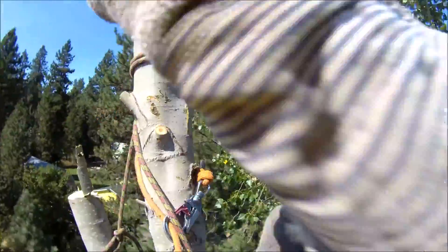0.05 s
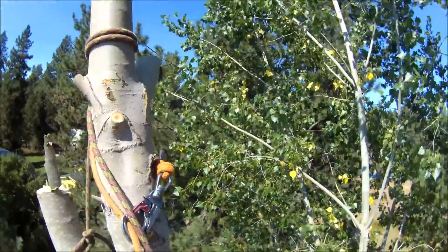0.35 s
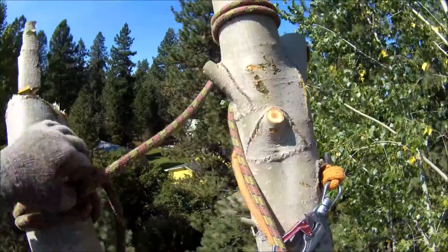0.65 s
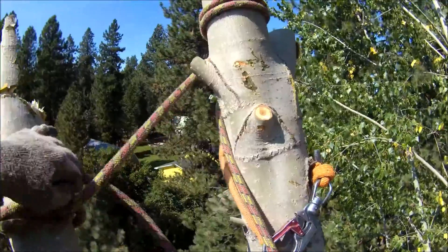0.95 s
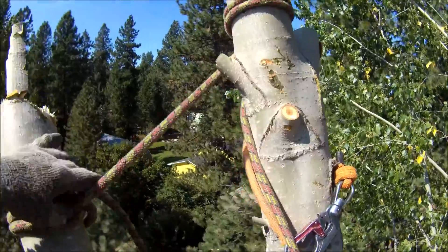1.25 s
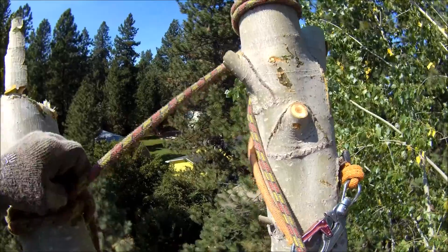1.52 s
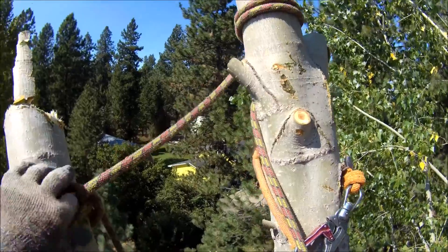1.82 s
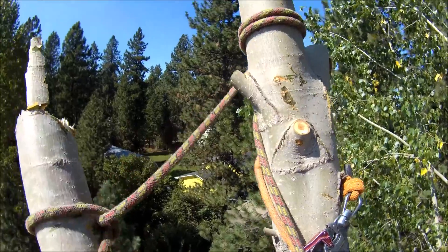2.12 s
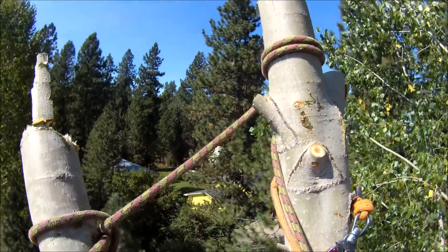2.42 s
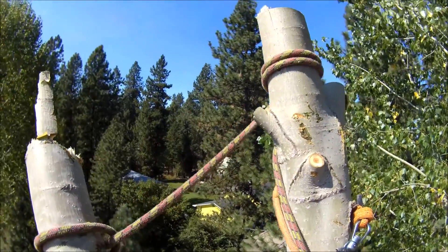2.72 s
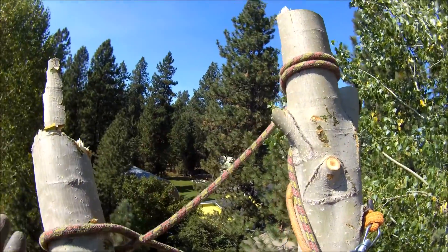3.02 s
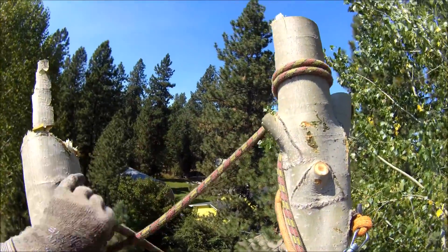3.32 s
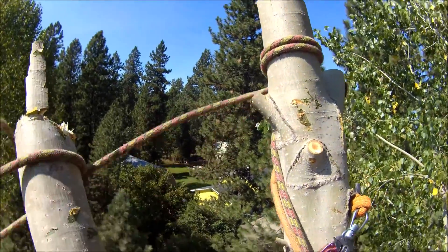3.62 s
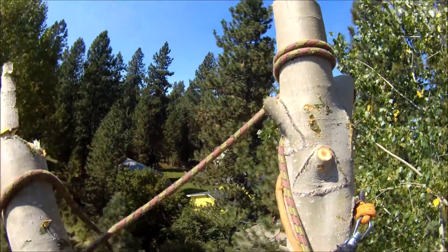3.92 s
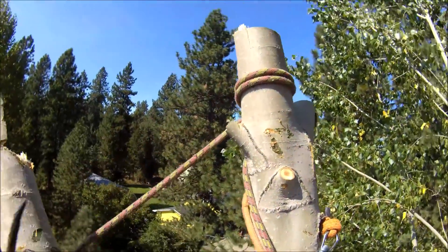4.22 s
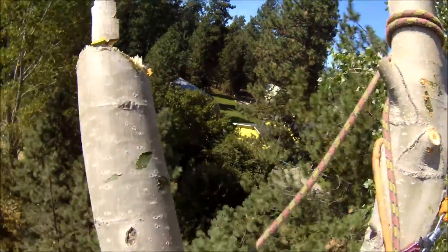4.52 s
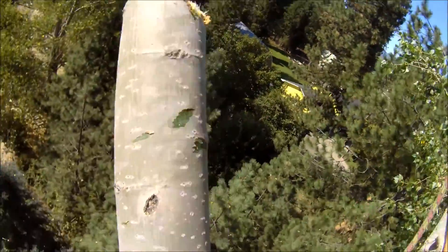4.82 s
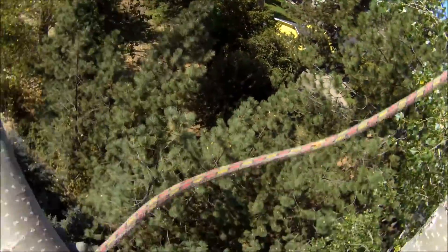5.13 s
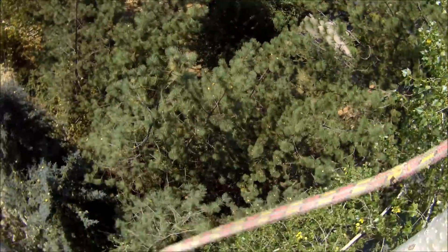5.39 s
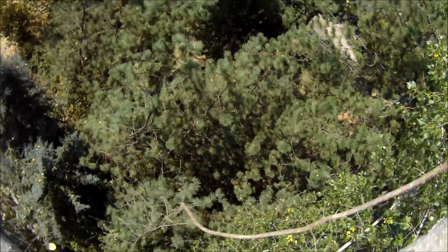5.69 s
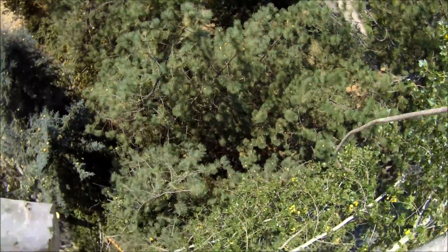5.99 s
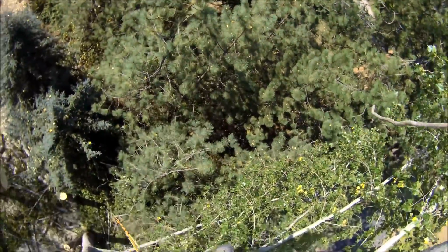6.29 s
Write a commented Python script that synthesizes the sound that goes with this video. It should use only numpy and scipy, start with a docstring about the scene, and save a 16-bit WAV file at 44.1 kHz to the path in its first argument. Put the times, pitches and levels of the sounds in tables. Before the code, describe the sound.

Steady wind rushes and rumbles high in a tree, sounding boxy through a helmet camera. At the start, gear scuffs and clacks loudly right by the microphone, and rope slips faintly over bark. Then a partly cut trunk section snaps close by with one loud, slightly distorted crack and a brief woody ring. The wind carries on with low gusts and a few hollow knocks on the helmet near the end.

```python
"""High in a tree, steady wind comes through the boxy housing of a climber's helmet camera and buffets it.
Gear scuffs and knocks on the helmet, a saw is hooked on and bumps the trunk as a sleeve brushes the
microphone with a muffled thud, and rope slips over bark.
At 2.65 s a partly cut trunk section snaps close by: its fibres tear, overloading the microphone's
input stage, and the freed trunk rings on. More slips of rope, gusts and knocks follow."""
import sys
import numpy as np
from scipy import signal
from scipy.fft import rfft, irfft
from scipy.io import wavfile
from scipy.ndimage import uniform_filter1d

SR = 44100
rng = np.random.default_rng(int(sys.argv[2]) if len(sys.argv) > 2 else 0)


def log_audio(samples):
    """Write samples as a 16-bit WAV file to the path given in sys.argv[1]."""
    # one column per channel
    frames = np.atleast_2d(samples).T
    # limit to full scale, then quantise
    limited = np.clip(frames, -1, 1)
    pcm = np.round(limited * 32767).astype(np.int16)
    wavfile.write(sys.argv[1], SR, pcm)


N = 280035
T = np.arange(N) / SR
RING_T = T[:int(.7 * SR)]  # time axis of one short event


def undb(db):
    """Decibels to amplitude ratio."""
    return 10 ** (np.asarray(db) / 20)


def unit(x):
    """Normalisation to rms 1."""
    return x / np.sqrt(np.mean(x ** 2))


def add(out, start_s, x):
    """Superposition: x joins out at its start time."""
    i = max(int(start_s * SR), 0)
    out[i:i + len(x)] += x[:N - i]


def colour(x, outline, peaks=()):
    """Spectral shaping by a (Hz, dB) outline with resonant peaks on top."""
    f = np.fft.rfftfreq(len(x), 1 / SR) + 1
    hz, db = np.transpose(outline)
    gain = undb(np.interp(np.log(f), np.log(hz), db))
    for centre, width, peak_db in peaks:
        gain *= 1 + (undb(peak_db) - 1) / np.hypot(1, 2 * (f - centre) / width) ** 2
    return irfft(rfft(x) * gain, len(x))


def noise(count, outline, peaks=()):
    """Coloured Gaussian noise of rms 1."""
    return unit(colour(rng.standard_normal(count), outline, peaks))


def soften(x, corner_hz):
    """Second-order low-pass: a softer contact carries less treble."""
    return signal.sosfilt(signal.butter(2, min(corner_hz, SR / 3), fs=SR, output="sos"), x)


def grains(count, spread_db):
    """Impulsive noise: dense clicks of uneven size."""
    clicks = rng.standard_normal(count)
    return unit(clicks * undb(spread_db * np.minimum(rng.exponential(size=count), 3)))


def wander(rate_hz):
    """Smooth random modulation of rms 1."""
    hold = int(SR / rate_hz)
    steps = np.repeat(rng.standard_normal(N // hold + 1), hold)
    return unit(uniform_filter1d(uniform_filter1d(steps, hold), hold)[:N])


def swell(length, t=RING_T):
    """Half-sine envelope: a movement speeds up and slows to rest."""
    return np.sin(np.pi * np.clip(t / length, 0, 1))


def fade(t60):
    """Exponential damping: a free vibration loses 60 dB in t60 seconds."""
    return np.exp(-np.log(1000) * RING_T / t60)


def ring(modes):
    """Modal superposition: damped sinusoids, neighbours in opposite phase."""
    return sum((-1) ** k * undb(db) * fade(t60) * np.sin(2 * np.pi * hz * RING_T)
               for k, (hz, db, t60) in enumerate(modes))


# Wind in the trees. Each row: frequency in Hz, relative spectral density in dB.
TREE_SPECTRUM = [(100, -0.5), (300, -0.5), (490, 2.5), (660, -4), (900, 2.5), (1380, 1), (1700, -3),
                 (2000, -9.5), (2900, -12.5), (3500, -18.5), (4900, -21), (5500, -16), (7000, -33)]
# Resonances of the housing. Each row: centre in Hz, width in Hz, gain in dB.
HOUSING_PEAKS = [(1105, 29, 6.5), (1310, 150, 4.5), (2825, 41, 4.5), (4380, 68, 15)]
def tree_wind(level_db=-48):
    """Cavity resonance: the housing colours the far rush of the trees."""
    return noise(N, TREE_SPECTRUM, HOUSING_PEAKS) * undb(level_db + 0.16 * wander(6.5))


# Gusts as the head turns. Each row: start in seconds, length in seconds, level in dB.
GUSTS = [(0, 1.07, -38.5), (2.05, 0.31, -41), (3.6, .25, -44), (4.7, 2.1, -42.5)]
def buffeting(steady_db=-44.5, flutter_db=-51.5):
    """Turbulent pressure: eddies push on the housing, and stronger ones flutter more."""
    push = undb(steady_db) + sum(undb(db) * swell(length, T - start) for start, length, db in GUSTS)
    push_db = 20 * np.log10(push)
    flutter_gain = undb(flutter_db + 0.25 * (push_db - push_db.mean()) + wander(11))
    rumble = noise(N, [(5, -15), (18, 13), (35, -1), (50, 3.5), (65, -11), (130, -46.5), (500, -86)])
    flutter = noise(N, [(40, -4), (90, 3), (150, -1.5), (210, -1), (280, -12.5), (1000, -35.5)])
    return rumble * push + flutter * flutter_gain


# Microphone hiss. Each row: frequency in Hz, relative spectral density in dB.
HISS_SPECTRUM = [(1000, 1.5), (7000, 1.5), (10000, -1.5), (15000, 0.5)]
def hiss(level_db=-64):
    """Self-noise: the microphone adds a steady broadband floor."""
    return undb(level_db) * noise(N, HISS_SPECTRUM)


# Gritty contact heard through the housing. Each row: frequency in Hz, relative spectral density in dB.
CONTACT_SPECTRUM = [(30, 5), (75, 6), (170, 9.5), (300, -2), (480, 7.5), (580, -10), (1100, 5),
                    (1550, -1.5), (2000, -11.5), (3100, -7.5), (3600, -17), (5000, -15), (6000, -10),
                    (8500, -29)]
def friction(length, corner_hz, skew=.7, trail=1.6):
    """Sliding friction: a dense run of tiny slips bites early and trails away."""
    pressure = swell(0.95, (RING_T / length) ** skew) ** trail
    slips = colour(grains(len(RING_T), spread_db=5.5), CONTACT_SPECTRUM)
    return unit(soften(slips, corner_hz)) * pressure


# Drags of gear. Each row: start in seconds, length in seconds, level in dB.
SCUFFS = [(.005, 0.078, -30.5), (0.065, 0.15, -26), (.36, 0.3, -48.5)]
def gear_scuffs():
    """Friction noise: gear drags over sleeve and helmet."""
    out = np.zeros(N)
    for start, length, db in SCUFFS:
        add(out, start, undb(db) * friction(length, corner_hz=3400))
    return out


# Modes of helmet and camera mount. Each row: frequency in Hz, level in dB, T60 in seconds.
HELMET_MODES = [(76, -24.5, 0.068), (107.5, -28, 0.098), (189.5, -19, 0.095), (295, -29.5, 0.055),
                (364, -22.5, 0.062), (440, -22.5, 0.057), (490, -24.5, 0.071), (920, -21, 0.023),
                (1057, -20.5, 0.058), (1150, -27.5, 0.014), (1644, -22, 0.03), (1920, -25.5, 0.031),
                (2210, -23.5, 0.037), (2440, -16, 0.0086), (2956, -18, 0.014), (4050, -28, 0.006),
                (4950, -41, 0.0052), (6660, -28, 0.015)]
def struck_helmet(spot_hz, neutral_hz=730, bass_db_per_octave=6.5):
    """Modal excitation: a spot favours modes near its pitch; a lower, softer one takes more bass."""
    bass_db = bass_db_per_octave * np.log2(neutral_hz / spot_hz)
    modes = []
    for hz, db, t60 in HELMET_MODES:
        shelf_db = bass_db / (1 + (hz / 600) ** 4)
        spot_db = 4 * np.exp(-10 * np.log2(hz / spot_hz) ** 2)
        modes.append((hz, db + shelf_db + spot_db, t60))
    return ring(modes)


# Blows on the helmet. Each row: start in seconds, gain in dB, contact corner in Hz, spot pitch in Hz.
KNOCKS = [(.018, -13.5, 1800, 200), (.028, -10.5, 5000, 352), (.061, 11, 7500, 1460),
          (0.0794, -9, 1310, 111), (0.0966, -4, 2600, 910), (0.4451, -10, 1740, 350), (.475, -17, 800, 330),
          (4.4199, -6, 2960, 347), (4.624, -15.5, 2290, 600), (4.798, -19, 1690, 1000),
          (4.828, -13.5, 1060, 1030), (5.735, -22.5, 1000, 455), (5.916, -27.5, 700, 190),
          (6.055, -0.5, 5640, 1170), (6.097, -7, 1680, 1100), (6.1706, -8, 2700, 470)]
def helmet_knocks(grit_db=-20, grit_t60_s=.048):
    """Impact: gear and rope ring the helmet through a gritty contact whose softness limits the treble."""
    out = np.zeros(N)
    for start, db, corner_hz, spot_hz in KNOCKS:
        grit = unit(colour(grains(len(RING_T), spread_db=-3), CONTACT_SPECTRUM))
        knock = struck_helmet(spot_hz) + undb(grit_db) * grit * fade(grit_t60_s)
        add(out, start, undb(db) * soften(knock, corner_hz))
    return out


# Modes of the hook. Each row: frequency in Hz, level in dB, T60 in seconds.
HOOK_MODES = [(996, 0.5, 0.031), (1310, 3, 0.015), (1800, 2, 0.0096), (3634, -8, 0.017), (5740, 3, 0.009),
              (8950, -22, 0.004)]
def saw_hook(start_s=.0622, gain_db=2.9):
    """Impulse response: the saw's steel hook snaps home and its heavily damped modes click."""
    out = np.zeros(N)
    add(out, start_s, undb(gain_db) * ring(HOOK_MODES))
    return out


# Modes of the trunk, bumped or snapped. Each row: frequency in Hz, level in dB, T60 in seconds.
TRUNK_MODES = [(85, -10, 0.12), (194.1, 3.5, 0.16), (245.4, 0.5, 0.064), (296, -8, 0.11), (379.9, -2, 0.29),
               (401.4, -0.5, 0.36), (482.2, -4, 0.23), (505, -14, 0.36), (535.4, -17.5, 0.32),
               (584, -32, 0.33), (995.6, -4, 0.23), (1079, -5.5, 0.23), (1181, -8.5, 0.2),
               (1233, -15, 0.19), (1355, -26, 0.29), (1434, -27, 0.37), (1719, -8, 0.15),
               (3000, -11, 0.038)]
def saw_bump_and_sleeve(start_s=.079, trunk_db=-26, sleeve_thud_db=-22):
    """Impact and friction: the saw rings the trunk; a sleeve brushes the microphone with a low thud."""
    out = np.zeros(N)
    sleeve_thud = friction(length=0.056, corner_hz=110)
    add(out, start_s, undb(trunk_db) * ring(TRUNK_MODES) + undb(sleeve_thud_db) * sleeve_thud)
    return out


# Rope on bark. Each row: frequency in Hz, relative spectral density in dB.
ROPE_SPECTRUM = [(3500, -7), (5000, -13), (5500, -2.5), (6300, -5.5), (7200, -29), (12000, -25.5)]
# Pulls of the rope. Each row: start in seconds, length in seconds, level in dB.
ROPE_PULLS = [(0.25, 0.33, -60), (1.99, 0.31, -65), (3.498, 0.12, -59), (4.97, 0.18, -67),
              (5.436, 0.41, -61.5)]
def rope_swishes(slack_db=-69.5, slack_spread_db=6):
    """Stick-slip friction: rope crosses bark in quick, uneven slips; slack rope shifts at random."""
    motion = undb(slack_db) * unit(undb(slack_spread_db * wander(7)))
    for start, length, db in ROPE_PULLS:
        add(motion, start, undb(db) * swell(length))
    rubbing = unit(colour(grains(N, spread_db=8), ROPE_SPECTRUM))
    slips = unit(undb(3.2 * wander(200)))
    return motion * rubbing * slips


# Catches of the rope. Each row: start in seconds, level in dB.
ROPE_TICKS = [(.379, -47), (.525, -46), (3.336, -44.5), (3.7197, -42)]
def rope_ticks():
    """Sudden release: a rope fibre catches on bark and lets go in a brief burst of treble."""
    out = np.zeros(N)
    spectrum = [(2500, -12), (4500, -4), (5500, 8.5), (8000, -12), (10000, -15), (15000, -34)]
    for start, db in ROPE_TICKS:
        add(out, start, undb(db) * noise(len(RING_T), spectrum) * fade(0.024))
    return out


# The trunk's dense modes, in bands. Each row: centre in Hz, level in dB, T60 in seconds.
TIMBER_BANDS = [(134, -4, 0.11), (417, 0, 0.17), (704, -27, 0.085), (1080, -9, 0.25), (1750, -21, 0.2),
                (2920, -22, 0.16), (5000, -22, 0.094)]
def trunk_ring(first_fibres_s=2.6502, freed_s=2.657):
    """Free vibration: dense modes blur into noise as fibres give; the freed trunk rings and beats."""
    out = np.zeros(N)
    for hz, db, t60 in TIMBER_BANDS:
        band = [(hz / 2, -50), (hz * .8, 0), (hz * 1.2, 0), (hz * 2, -50), (hz * 10, -90)]
        add(out, first_fibres_s, undb(db) * noise(len(RING_T), band) * fade(t60))
    add(out, freed_s, ring(TRUNK_MODES))
    return out


# Tearing wood fibres. Each row: frequency in Hz, relative spectral density in dB.
FIBRE_SPECTRUM = [(200, 1), (490, 7), (640, -8), (820, -7.5), (1050, 4.5), (2400, -5.5), (3050, 5.5),
                  (3700, -18), (12000, -5)]
def splinter(db, corner_at_0_db_hz=1780, db_per_octave=16.5, time_constant_s=0.0034):
    """Brittle fracture: a fibre bundle breaks in a burst of clicks, brighter under greater force."""
    clicks = colour(grains(len(RING_T), spread_db=7.5), FIBRE_SPECTRUM)
    corner_hz = corner_at_0_db_hz * 2 ** (db / db_per_octave)
    return undb(db) * unit(soften(clicks, corner_hz)) * np.exp(-RING_T / time_constant_s)


# The wooden hinge tears, then its last strips. Each row: start in seconds, level in dB.
TEARS = [(2.653, 15.5), (2.697, -2), (2.715, -9.5)]
def hinge_tears(splinters=8, mean_gap_s=.0065, fall_db_per_s=641):
    """Crack propagation: each tear runs on as almost evenly spaced splinters, ever weaker and duller."""
    out = np.zeros(N)
    for start, db in TEARS:
        gaps = mean_gap_s * rng.uniform(.5, 1.5, splinters)
        for delay in np.cumsum(gaps) - gaps[0]:
            add(out, start + delay, splinter(db - fall_db_per_s * delay))
    return out


def scene():
    """Superposition: all sources sum at one microphone."""
    background = tree_wind() + buffeting() + hiss()
    gear = gear_scuffs() + helmet_knocks() + saw_hook() + saw_bump_and_sleeve()
    rope = rope_swishes() + rope_ticks()
    snap = trunk_ring() + hinge_tears()
    return (background + gear + rope + snap)[None]


def record(dry, ceiling=.41, offset=.064, corner_hz=12260, cutoff_hz=15650):
    """Asymmetric clipping: the off-centre input stage saturates; the top is rounded, then cut."""
    oversampled = signal.resample_poly(dry, 4, 1, axis=1) + offset
    clipped = oversampled / (1 + (oversampled / ceiling) ** 16) ** (1 / 16)
    rounded = soften(signal.resample_poly(clipped - offset, 1, 4, axis=1), corner_hz)
    steep_lowpass = signal.ellip(10, .1, 80, cutoff_hz, fs=SR, output="sos")
    return offset + signal.sosfilt(steep_lowpass, rounded)


dry = scene()
out = record(dry)
log_audio(out)
```